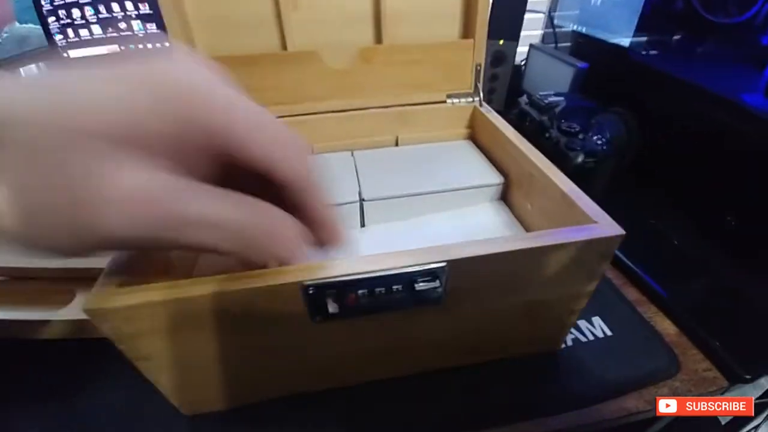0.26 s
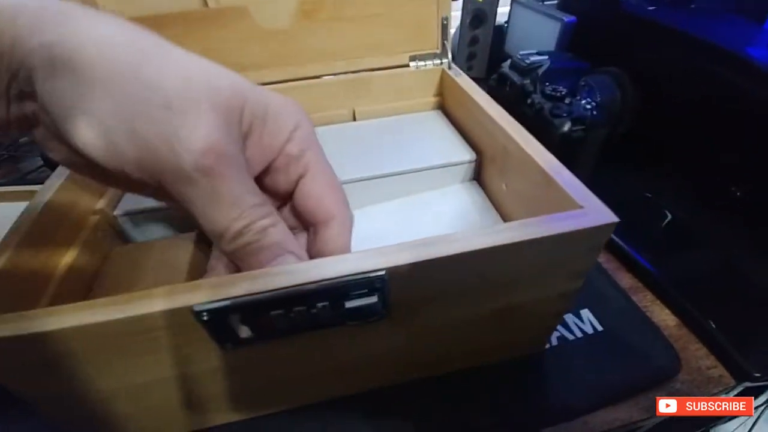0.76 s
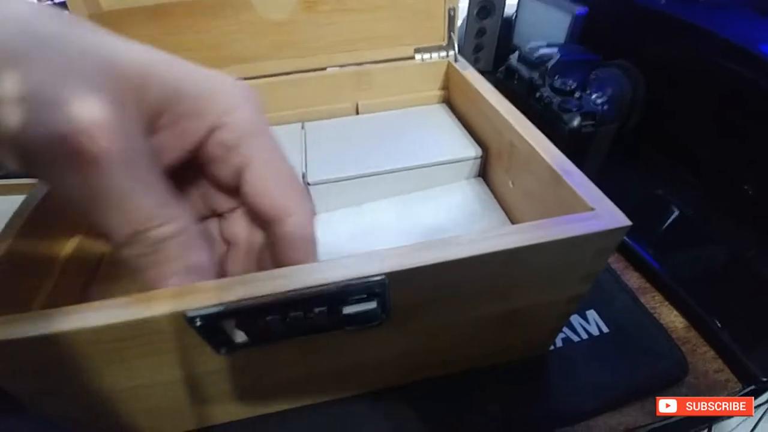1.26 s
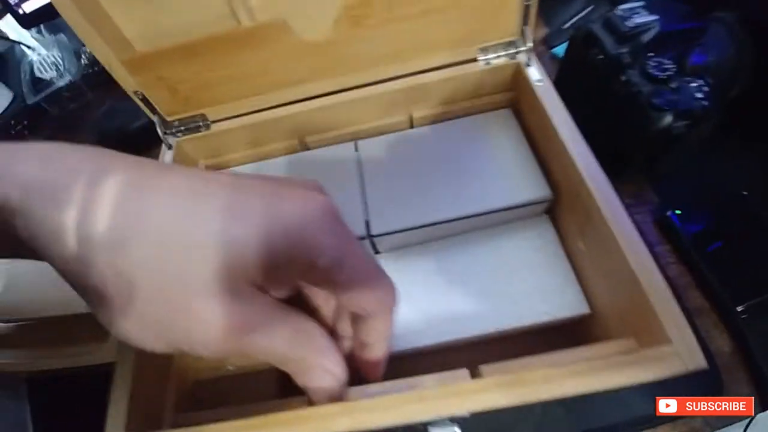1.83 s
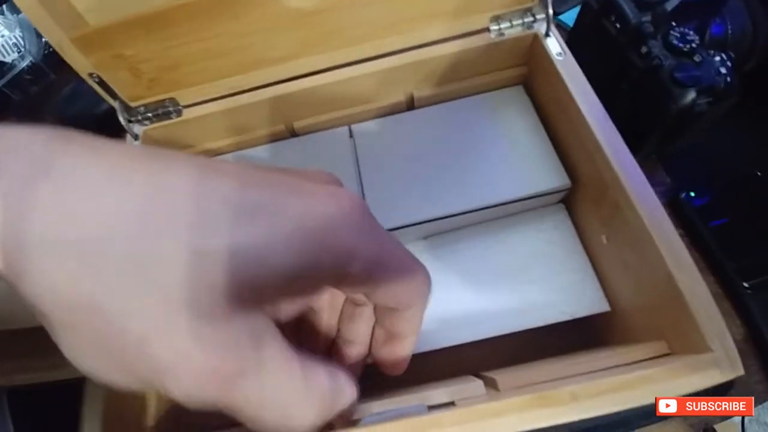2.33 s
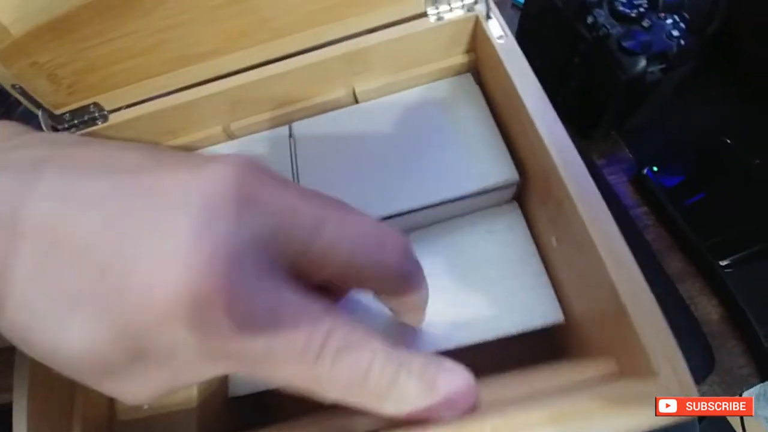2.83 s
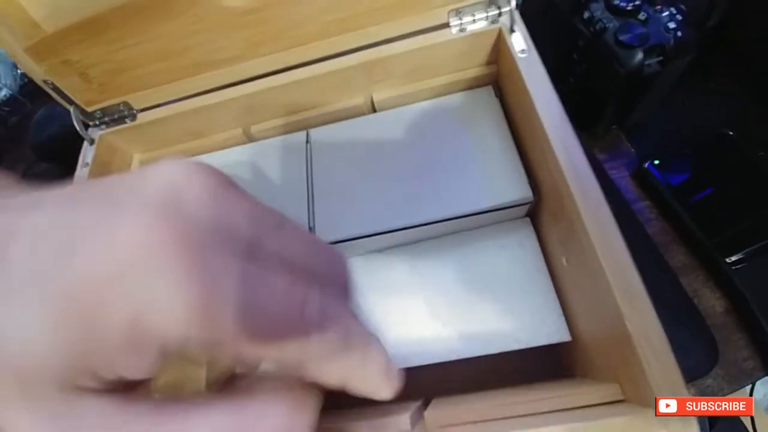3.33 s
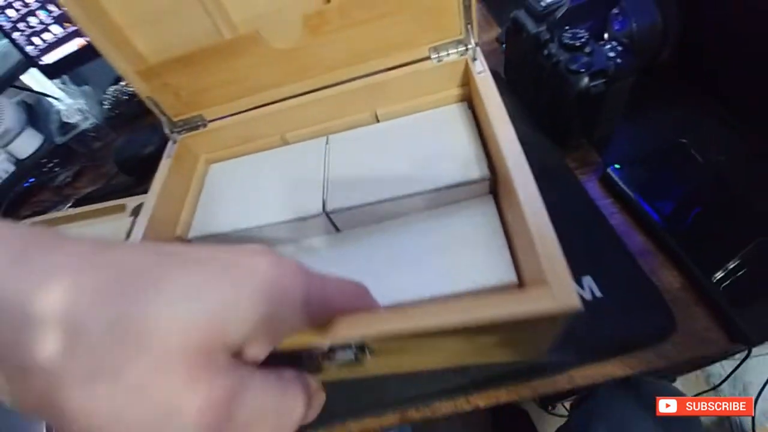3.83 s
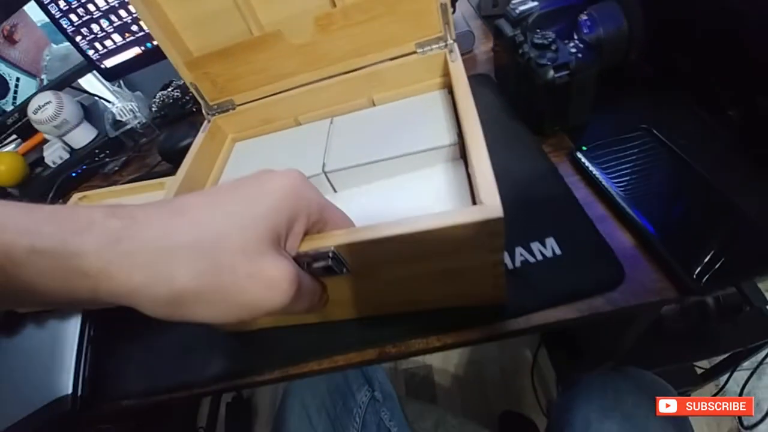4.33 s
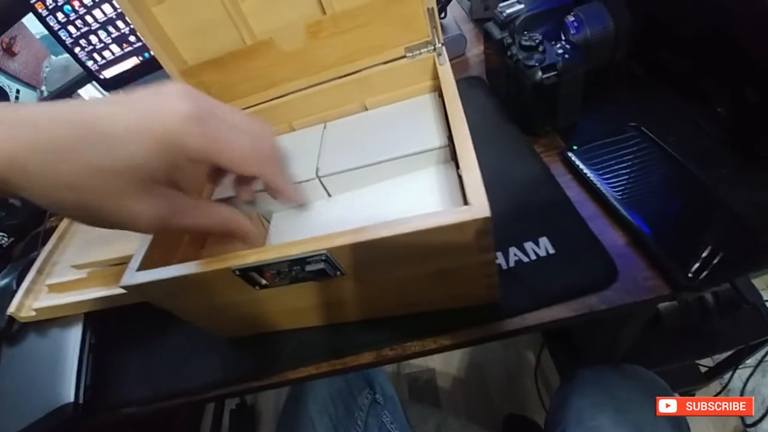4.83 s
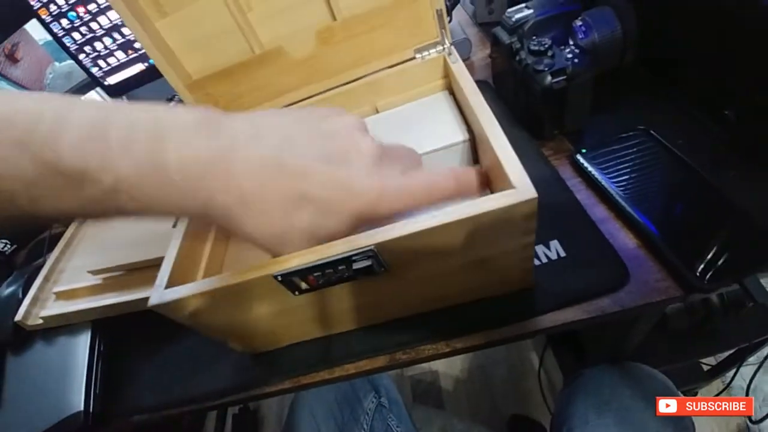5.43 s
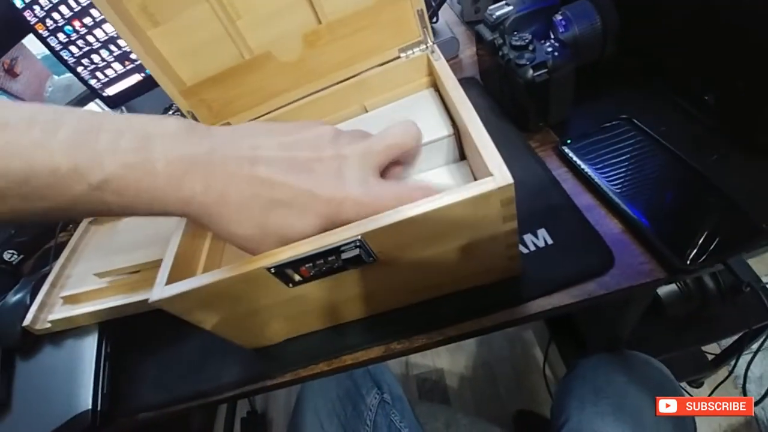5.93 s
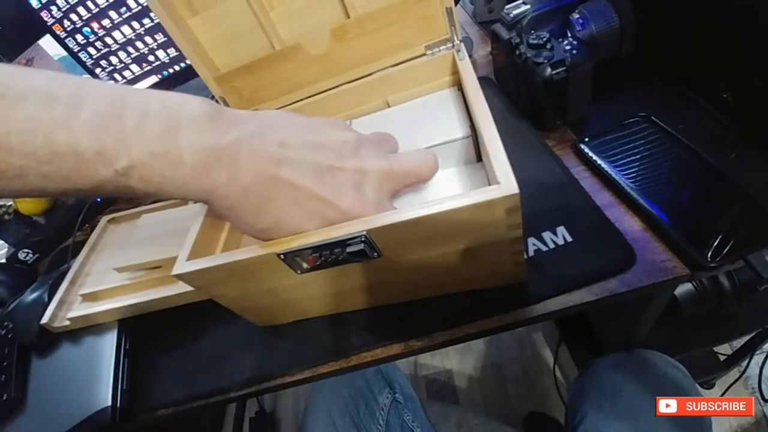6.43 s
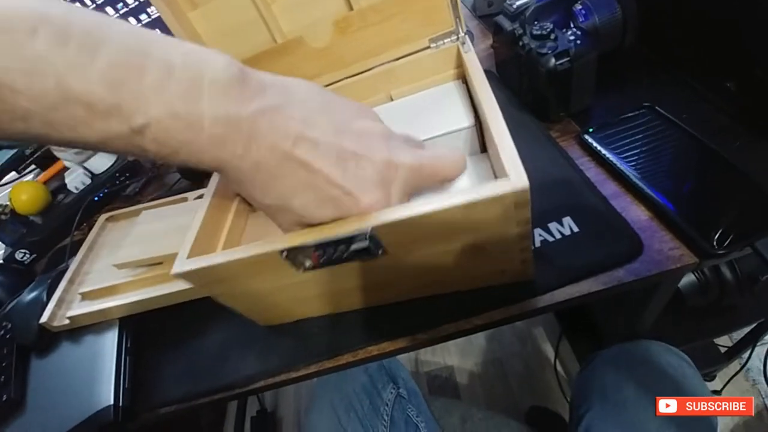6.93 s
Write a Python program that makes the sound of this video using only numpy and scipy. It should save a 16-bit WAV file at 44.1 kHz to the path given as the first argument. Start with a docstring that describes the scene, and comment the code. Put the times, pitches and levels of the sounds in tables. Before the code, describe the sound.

Foam blocks rub and hiss against the inside of a wooden box in short strokes, with small ticks, knocks and a late stuttering judder.

```python
"""Mains hum and fan noise run throughout; after a faint brush at 0.0 s, a hand works tight foam blocks and
dividers in a wooden box from about 0.25 s. Strokes are streams of tiny slips: foam hisses and sizzles,
edges scratch, walls rasp, the hollow hums. Bands of friction swell; edges tick, dividers knock, the box bumps.
From 6.28 to 6.63 s a block judders in stick-slip: each jerk is a noise snap, a wall ring and a thud.
A last hard catch, knock and bump come near 6.9 s, then strokes to 7.2 s."""
import sys
import numpy as np
from scipy import signal
from scipy.fft import rfft, irfft, next_fast_len
from scipy.io import wavfile
from scipy.ndimage import uniform_filter1d

SR = 44100
rng = np.random.default_rng(int(sys.argv[2]) if len(sys.argv) > 2 else 0)


def log_audio(samples):
    """Write samples as a 16-bit WAV file to the path given in sys.argv[1]."""
    # one column per channel
    frames = np.atleast_2d(samples).T
    # limit to full scale, then quantise
    limited = np.clip(frames, -1, 1)
    pcm = np.round(limited * 32767).astype(np.int16)
    wavfile.write(sys.argv[1], SR, pcm)


N = 316197
TIME = np.arange(N) / SR

# friction spectra, relative density: hz, level_db
HISS = [(2500, -19.5), (4000, -11), (5050, 2), (5700, -2), (6600, -2.5), (7100, -2), (7950, 4),
        (8600, -2.5), (9400, -12.5), (10300, -47), (12000, -47)]
SIZZLE = [(9300, -7.5), (11000, -13), (13100, -2), (14300, -3.5), (15700, -9)]
SCRATCH = [(1300, -3), (2200, 5.5), (2700, 1), (3200, 5.5), (4100, 5), (5000, -5.5), (7000, -35)]
RASP = [(400, -26.5), (700, -8.5), (835, -3.5), (945, -3.5), (1110, 2.5), (1370, -1), (1560, -4),
        (1800, -3), (2200, -15.5), (3000, -18.5)]
HOLLOW = [(130, -8.5), (190, -24.5), (260, -9), (350, -9), (430, 2.5), (520, -0.5), (630, -7.5), (850, -23)]
# fast roughness of the grip: spread, random level points per second
GRAIN_DB, GRAIN_PER_S = 1.0, 600


def rubbing(hand_db):
    """Foam drags over wood; the grip flutters and shakes all parts of the sound together."""
    hiss_db, rasp_db, hollow_db, sizzle_db = stroke_levels()
    grip_db = 1.76 * drift(25) + 1.0 * drift(90) + GRAIN_DB * drift(GRAIN_PER_S)

    foam_slips = between_walls(slips(per_s=2900, spread_db=3.0, smooth=0.9))
    hiss = from_db(hiss_db) * colour(foam_slips, closed(HISS))
    sizzle = from_db(sizzle_db - 8.5) * colour(foam_slips, closed(SIZZLE))

    # edge scratch lies between foam and wall, follows both
    scratch_db = 0.61 * hiss_db + 0.5 * rasp_db + 0.35
    edge_slips = between_walls(slips(per_s=1200, spread_db=1.0, smooth=0.72))
    scratch = from_db(scratch_db) * colour(edge_slips, closed(SCRATCH))

    wall_slips = slips(per_s=1500, spread_db=1.5, smooth=0.52)
    rasp = from_db(rasp_db) * retuned(colour(wall_slips, closed(RASP)))

    hollow_slips = slips(per_s=1000, spread_db=1.0, smooth=0.86)
    hollow = from_db(hollow_db) * colour(hollow_slips, closed(HOLLOW))

    return from_db(grip_db) * (pan(hiss + sizzle, hand_db) + scratch + rasp + pan(hollow, 4.5))


# strokes of foam over wood, levels relative:
# start_s, end_s, attack_s, swell_start_to_end_db, hiss_db, rasp_db, hollow_db, sizzle_db
STROKES = [(0.0, 0.049, 0.052, -12, -44, -45, -53, -88), (0.248, 0.285, 0.00053, 2, -40, -35, -30.5, -51),
           (0.263, 0.327, 0.0022, 5, -22.5, -31.5, -44, -22),
           (0.342, 0.43, 0.002, -16, -47, -48.5, -47, -58.0),
           (0.469, 0.592, 0.014, -2, -39, -42.5, -46, -45), (0.684, 0.769, 0.01, 12, -28, -36.5, -42, -37),
           (0.839, 0.947, 0.011, -2, -26.5, -27.5, -35, -35),
           (0.972, 1.154, 0.0066, -2.5, -28, -34, -45, -38),
           (1.135, 1.274, 0.0082, 35, -49, -48.5, -52.5, -54),
           (1.311, 1.389, 0.038, 4, -28.5, -31.5, -38, -37),
           (1.484, 1.84, 0.0028, -15.5, -52.5, -51, -54.5, -80),
           (1.64, 1.681, 0.012, -12.5, -38.5, -38, -39, -50),
           (1.834, 1.964, 0.0022, 20.5, -35, -34.5, -46.5, -40),
           (1.963, 2, 0.002, 20, -38, -36.5, -43.5, -46), (2.096, 2.224, 0.014, 1, -57.5, -51.5, -48, -69),
           (2.21, 2.226, 0.0016, 15.5, -30, -35, -48, -29.5),
           (2.275, 2.386, 0.00093, 25, -30, -40.5, -54, -34),
           (2.416, 2.486, 0.029, 3.5, -16, -31.5, -35.5, -12.5),
           (2.648, 2.646, 0.024, 15, -21.5, -33, -37, -28),
           (2.719, 2.803, 0.0061, -9.5, -22.5, -36, -41.5, -26),
           (2.786, 3.045, 0.0019, -7.5, -41.5, -45.5, -47.5, -48.5),
           (3.212, 3.23, 0.01, 7, -23.5, -31.5, -36.5, -25),
           (3.449, 3.465, 0.0085, -26, -24.5, -65, -50, -35),
           (3.469, 3.564, 0.015, 11, -39, -34, -39.5, -40),
           (3.574, 3.686, 0.026, -4, -18, -32.5, -33, -21.5),
           (3.684, 3.867, 0.004, 19, -33.5, -36.5, -38, -40),
           (3.887, 3.995, 0.0039, 3, -39.5, -36.5, -40.5, -44),
           (3.98, 4.23, 0.0026, -7, -50, -55, -56.5, -54), (4.25, 4.507, 0.0076, 7.5, -32, -35, -42.5, -40),
           (4.482, 4.529, 0.028, 0, -14.5, -40, -38, -21), (4.817, 4.913, 0.073, 18, -58, -56, -54.5, -65),
           (4.926, 5.067, 0.0015, 12, -26, -40, -65, -26.5),
           (5.001, 5.178, 0.013, -8.5, -29, -33.5, -35, -36),
           (5.244, 5.311, 0.0066, -6, -20.5, -29, -30.5, -22.5),
           (5.431, 5.488, 0.035, -19, -20.5, -29.5, -35.5, -25.5),
           (5.621, 5.706, 0.019, -4, -29, -36.5, -44.5, -32),
           (5.75, 5.819, 0.027, -12.5, -28.5, -33, -52.5, -34),
           (5.929, 5.993, 0.047, -18, -23.5, -38.5, -42.5, -24),
           (5.95, 6.115, 0.0032, -8, -36.5, -37.5, -61, -44),
           (6.127, 6.243, 0.034, -16, -20, -31, -30, -25), (6.215, 6.654, 0.01, -4.5, -28.5, -27, -36, -33),
           (6.693, 6.913, 0.059, -5.5, -36, -40, -48.5, -38.5),
           (6.892, 7.064, 0.0031, -7, -31.5, -29, -42, -41),
           (7.064, 7.196, 0.017, -0.5, -25.5, -28, -37.5, -32)]
# slope against stroke speed: hiss, rasp, hollow, sizzle [dB per dB]
FOLLOWS_SPEED = [1.19, 0.92, 0.69, 1.33]
# fingers brushing the foam from TOUCH_S on: hiss_db, rasp_db, hollow_db, sizzle_db
BRUSH_DB = [-70.5, -83, -82, -106]
# level change of the steady rubbing during the whole judder: hiss_db, rasp_db, hollow_db, sizzle_db
STUCK_DB = [-1, -2.5, -7, 0]
TOUCH_S, RELEASE_S = 0.25, 0.011


def stroke_levels():
    """Each push sets in, swells or fades, and glides to rest; gives hiss, rasp, hollow and sizzle in dB."""
    t = np.arange(0, N / SR + .001, .001)
    power = 1e-12 + from_db(BRUSH_DB)[:, None] ** 2 * (t > TOUCH_S)
    for start_s, end_s, attack_s, swell_db, *levels_db in STROKES:
        onset = np.logaddexp(0, (start_s - t) / attack_s)
        release = np.logaddexp(0, (t - end_s) / RELEASE_S)
        swell = swell_db * np.interp(t, [start_s, end_s], [-.5, .5])
        speed_db = swell - 20 / np.log(10) * (onset + release)
        stroke_db = np.array(levels_db)[:, None] + np.outer(FOLLOWS_SPEED, speed_db)
        power = power + from_db(stroke_db) ** 2
    juddering = (t > JERKS[0][0]) & (t < JERKS[-1][0])
    stuck = uniform_filter1d(1. * juddering, size=40)  # 40 ms edges
    return [np.interp(TIME, t, 10 * np.log10(p) + drop_db * stuck) for p, drop_db in zip(power, STUCK_DB)]


def slips(per_s, spread_db, smooth):
    """Two streams of micro-slips of uneven size on a bed of smooth friction noise."""
    sizes = from_db(spread_db * np.minimum(rng.exponential(1, (2, N)), 4))
    signed = sizes * rng.choice([-1, 1], (2, N))
    happens = rng.random((2, N)) < per_s / SR
    return rms_one(signed * happens) + smooth * rng.standard_normal((2, N))


def between_walls(streams, count=4):
    """Echoes off the near walls, their paths changing as the hand moves, comb friction into shifting bands."""
    out, at = streams.copy(), np.arange(N)
    for k, lag_s in enumerate(np.geomspace(.0005, .0026, count)):
        for side in range(2):
            lag = lag_s * SR * np.exp(.4 * drift(3))
            out[side] += (-1) ** k * .42 * np.interp(at - lag, at, streams[side])
    return out


WALL_DETUNE = 0.012  # spread of log speed


def retuned(x):
    """Hand and blocks load the thin walls differently as they move, so their resonances slide a little."""
    speed = np.exp(WALL_DETUNE * drift(3))
    at = np.cumsum(speed / speed.mean())
    return np.array([np.interp(at, np.arange(N), channel) for channel in x])


# bands swelling in a stroke or brief touch, levels relative: start_s, end_s, centre_hz, width_hz, level_db
SINGS = [(0.241, 0.265, 2760, 895, -23.5), (0.252, 0.334, 5130, 330, -13.5), (0.804, 0.983, 1146, 376, -23),
         (0.97, 1.113, 1700, 450, -28.5), (1.166, 1.195, 1820, 1650, -20.5), (1.901, 2.032, 1660, 260, -21),
         (2.269, 2.33, 1460, 640, -26.5), (2.317, 2.424, 6130, 250, -26), (2.406, 2.5, 8070, 300, -14.5),
         (2.708, 2.758, 5100, 1200, -18.5), (3.539, 3.715, 1110, 750, -14.5),
         (3.792, 3.885, 1110, 785, -18.5), (4.48, 4.534, 7900, 350, -15), (4.473, 4.517, 3070, 446, -21.5),
         (4.686, 4.698, 3440, 890, -32.5), (4.713, 4.722, 8100, 2080, -19.5),
         (4.736, 4.95, 3200, 1200, -51), (4.927, 4.96, 7750, 1410, -15), (5.194, 5.252, 910, 160, -27),
         (5.406, 5.45, 917, 157, -15), (6.066, 6.224, 1055, 250, -15.5), (6.173, 6.475, 3440, 2400, -30),
         (6.557, 6.559, 6740, 2600, -2.5)]


def singing(hand_db):
    """Friction swells in one band, narrow or broad, during part of a stroke or a brief touch."""
    out, streams = np.zeros((2, N)), slips(per_s=740, spread_db=3.5, smooth=0.34)
    for start_s, end_s, hz, width_hz, db in SINGS:
        span = slice(int(start_s * SR), int(end_s * SR))
        friction = streams[:, span] + 0.24 * streams[::-1, span]  # partly shared by both channels
        edges_hz = [max(hz - width_hz / 2, hz / 2), hz + width_hz / 2]
        band = signal.butter(2, edges_hz, "band", fs=SR, output="sos")
        tone = rms_one(signal.sosfilt(band, friction))
        out[:, span] += from_db(db - 6.5) * tone * signal.windows.tukey(friction.shape[1], .7)
    return pan(out, hand_db)


# jerks of a tight block along the wall, levels relative: start_s, snap_db, wall_db, thud_db
JERKS = [(6.277, -28, -31, -14), (6.3, -25, -14, -8.5), (6.324, -17, -10, -9), (6.3456, -18, -11.5, -9),
         (6.378, -18, -9, -8), (6.3968, -25, -9, -13.5), (6.426, -22, -7, -10), (6.4447, -7, -15, -32),
         (6.452, -15, -9, -6.5), (6.473, -17, -12, -20), (6.49, -19, -11, -8.5), (6.518, -11, -3, -5),
         (6.5489, -12.5, -10, -33), (6.575, -11, -11, -11), (6.603, -5, -3, -34), (6.633, -15.5, -12, -42)]
# block snap spectrum, relative density: hz, level_db
BLOCK_SNAP = [(800, -25), (2000, 10), (5000, 7), (8000, 13.5), (10500, -8), (16000, -6)]
# cushioned thud modes, nominal: pitch_hz, level_db, t60_s
THUD_MODES = [(324, -10, 0.051), (500, 15, 0.013), (873, -4.5, 0.041)]
JERK_SNAP_S = 0.003


def judder():
    """The whole block jumps and stops, so each jerk snaps and also gives a cushioned thud."""
    snap_rows = [(s, snap_db, wall_db, JERK_SNAP_S) for s, snap_db, wall_db, _ in JERKS]
    thud_rows = [(s, thud_db, 1) for s, _, _, thud_db in JERKS]
    return catches(snap_rows, BLOCK_SNAP) + strike(thud_rows, THUD_MODES, rise_s=0.0057)


# edge catches, levels relative: start_s, snap_db, wall_db, snap_decay_s
TICKS = [(0.246, -51, -25, 0.0014), (0.283, -5, -20, 0.0023), (0.841, -33, -13.5, 0.0032),
         (1.585, -25.5, -24.5, 0.0034), (1.865, -19.5, -17.5, 0.002), (1.944, -13.5, -25, 0.0042),
         (2.654, -18.5, -56, 0.0035), (3.44, -16, -24, 0.0085), (3.992, -37, -18.5, 0.0033),
         (4.289, -25, -28, 0.0052), (4.307, -16.5, -22, 0.0014), (4.327, -15, -22, 0.0017),
         (4.685, -30, -70, 0.00092), (4.6935, -28.5, -74, 0.0013), (4.724, -26.5, -52, 0.0014),
         (4.749, -33, -46, 0.0014), (5.656, -20, -43, 0.0036), (5.832, -16, -32, 0.0018),
         (5.8477, -1, -13.5, 0.0023), (6.808, -19, -49, 0.003), (6.899, -13.5, -6.5, 0.0029),
         (7.05, -16.5, -50, 0.0081)]
# edge snap spectrum, relative density: hz, level_db
EDGE_SNAP = [(1300, -26), (2700, 5), (5000, 10), (8200, 11), (10500, -12), (13000, -3.5), (16000, -16)]


def ticks():
    """Catches of an edge on the wood of the box."""
    return catches(TICKS, EDGE_SNAP)


# thin wall modes, nominal: pitch_hz, level_db, t60_s
WALL_MODES = [(1018, -1.5, 0.0072), (1143, 1, 0.015), (1330, -7.5, 0.016), (1874, -9, 0.017)]


def catches(rows, spectrum):
    """A catch tears free within a millisecond: a gritty noise snap and a ring of the wall."""
    burst, t = np.zeros((2, N)), TIME[None, :SR // 20]
    for s, snap_db, _, decay_s in rows:
        add(burst, s, from_db(snap_db) * np.exp(-t / decay_s))
    grit = colour(between_walls(rng.standard_normal((2, N))), closed(spectrum))
    wall = strike([(s, wall_db, 1) for s, _, wall_db, _ in rows], WALL_MODES, rise_s=0.00091)
    return pan(uniform_filter1d(burst, size=30) * grit, 2.2) + wall


# dividers knocking on the box, levels relative: start_s, level_db, pitch_ratio
KNOCKS = [(0.343, -15, 1.05), (1.1805, -8.5, 1.06), (1.205, -22.5, 0.81), (1.237, -26, 0.94),
          (1.371, -18, 0.95), (1.599, -27, 0.89), (1.63, -29, 0.99), (1.665, -27, 1.07), (1.757, -28, 0.87),
          (1.778, -20.5, 0.91), (1.79, -20, 1.07), (1.798, -23, 0.94), (2.334, -29, 0.98),
          (2.369, -15.5, 1.025), (2.722, -24, 0.94), (2.836, -32, 0.79), (3.059, -39, 1.3),
          (4.724, -37.5, 0.97), (4.969, -24, 1.02), (5.023, -24, 1.02), (5.074, -28, 1.02),
          (5.73, -26, 1.07), (6.898, -13, 0.9)]
# hollow box modes, nominal: pitch_hz, level_db, t60_s
HOLLOW_MODES = [(325, -3.5, 0.02), (447.4, 1.5, 0.038), (421, -6, 0.13), (526, -14.5, 0.03),
                (1250, -18.5, 0.027)]
# box bumping on the desk, levels relative: start_s, level_db
BUMPS = [(0.275, -22.5), (1.552, -25), (1.612, -26), (2.242, -32), (2.379, -26), (2.974, -28.5),
         (3.211, -30), (5.463, -17.5), (6.898, -19)]
# desk modes, nominal: pitch_hz, level_db, t60_s
DESK_MODES = [(72, 0.5, 0.055), (137.7, -7, 0.072)]


def knocks():
    """Padded blows on the hollow box, and the box on the desk, each ringing a set of modes."""
    box = strike(KNOCKS, HOLLOW_MODES, rise_s=0.002)
    desk = strike([(s, db, 1) for s, db in BUMPS], DESK_MODES, rise_s=0.0052)
    return box + desk


# left lean of struck modes: hz, left_over_right_db
BALANCE = [(60, 3), (350, 4.4), (600, 6.2), (1200, 0.24), (2500, 6.9), (5000, 2.5)]
# mode spread from blow to blow: level, share of pitch
BLOW_UNEVEN_DB, BLOW_DETUNE = 1.5, 0.025


def strike(blows, modes, rise_s):
    """Each blow builds up over its contact and rings every mode with a strength and pitch of its own."""
    out, t = np.zeros((2, N)), TIME[:SR // 4]
    contact = 1 - np.exp(-t / rise_s)
    for s, db, pitch_ratio in blows:
        spreads = rng.standard_normal((len(modes), 2))
        for (hz, mode_db, t60_s), (louder, higher) in zip(modes, spreads):
            rung_hz = hz * pitch_ratio * (1 + BLOW_DETUNE * higher)
            swing = np.sin(2 * np.pi * rung_hz * t) * contact
            level_db = db + mode_db + BLOW_UNEVEN_DB * louder - 60 * t / t60_s
            add(out, s, pan(swing * from_db(level_db), at_hz(BALANCE, hz)))
    return out


ROOM_T60_S = 0.13  # before the treble cut


def room(x, wall_cut_hz):
    """Dense, slightly dull reflections of a small furnished room: low-passed, decaying noise."""
    t = TIME[:SR // 2]
    tail = rng.standard_normal((2, len(t))) * from_db(-60 * t / ROOM_T60_S) * (t > .004)
    tail = signal.sosfilt(signal.butter(1, wall_cut_hz, fs=SR, output="sos"), tail)
    return signal.fftconvolve(x, tail / np.sqrt(np.sum(tail ** 2) / 2), axes=1)[:, :N]


# background swing as the microphone moves about: time_s, swing_db
BACKGROUND_LEVEL = [(0.1, -6.5), (0.9, 3), (2.2, -5), (3.35, -11), (3.9, 0), (4.7, -3.5), (5.2, 4),
                    (7.17, 6.5)]
# mains hum, level before swing and waver: mains_multiple, rms_db, share_of_swing
HUM = [(1, -51, 0.43), (2, -53, 0.72)]
# fan spectrum, relative density: hz, level_db
FAN = [(25, -18), (65, -7), (150, -15.5), (190, -15.5), (450, -23.5), (1300, -35), (1800, -28), (3300, -42),
       (8000, -47.5), (11000, -68)]
MAINS_HZ, HUM_WAVER_DB = 60, 1.8
FAN_DB, FAN_FOLLOWS = -51.5, 0.45  # level before swing, share of swing


def background():
    """A computer fan as shaped noise and a mains hum as sines of wavering level."""
    swing_db, = in_time(BACKGROUND_LEVEL)
    hum = 0
    for multiple, db, share in HUM:
        level_db = db + share * swing_db + HUM_WAVER_DB * drift(3.9)
        phase = 2 * np.pi * (multiple * MAINS_HZ * TIME + rng.random())
        hum = hum + from_db(level_db) * np.sqrt(2) * np.sin(phase)
    fan = from_db(FAN_DB + FAN_FOLLOWS * swing_db) * colour(rng.standard_normal((2, N)), FAN)
    return pan(hum + fan, 3.4)


# stereo likeness: hz, left_right_correlation
LIKENESS = [(100, 1), (450, 0.8), (1100, 0.5), (2000, 0), (5000, -0.11), (8000, 0.56), (13000, 0.75)]


def colour(streams, spectrum):
    """Shape a pair: alike in the bass, unlike from 2 to 5 kHz, more alike again in the treble; rms 1."""
    size = next_fast_len(N)
    hz = np.maximum(np.fft.rfftfreq(size, 1 / SR), 1)
    mid, side = rfft(streams, size) * from_db(at_hz(spectrum, hz))
    alike = np.clip(at_hz(LIKENESS, hz), -1, 1)
    pair = np.sqrt(1 + alike) * mid + np.sqrt(1 - alike) * side * [[1], [-1]]
    return rms_one(irfft(pair, size)[:, :N])


def closed(spectrum):
    """Let a spectrum fall to -70 dB an octave beyond each end."""
    return [(spectrum[0][0] / 2, -70), *spectrum, (spectrum[-1][0] * 2, -70)]


def drift(per_s):
    """Random wander with rms 1, linear between per_s random points a second."""
    knots = rng.standard_normal(int(N / SR * 2000))
    return rms_one(np.interp(TIME * per_s, np.arange(len(knots)), knots))


def pan(x, db):
    """Lean to the left by db at equal power."""
    gains = from_db(np.array([[.5], [-.5]]) * db)
    return x * gains / np.sqrt(np.mean(gains ** 2, axis=0))


def add(out, s, sound):
    """Mix a sound into both channels at a time."""
    at = int(np.clip(s * SR, 0, N - 1))
    out[:, at:at + sound.shape[1]] += sound[:, :N - at]


def at_hz(points, hz):
    """Read a spectrum on a log-frequency axis."""
    points_hz, values = np.array(points).T
    return np.interp(np.log(hz), np.log(points_hz), values)


def in_time(rows):
    """Each column of a curve at every sample."""
    s, *columns = np.transpose(rows)
    return [np.interp(TIME, s, c) for c in columns]


def rms_one(x):
    """Scale to unit rms."""
    return x / np.sqrt(np.mean(x ** 2) + 1e-20)


def from_db(db):
    """Decibels to gain."""
    return 10 ** (np.asarray(db) / 20)


# where the hand works: time_s, left_over_right_db
PLACE = [(0.25, 3.5), (1.25, 4), (1.8, 1), (2.45, 0), (2.7, 2.5), (3.3, 3.5), (3.7, 0.5), (4.5, 3),
         (7.17, 3)]


def scene():
    """Strokes and contacts close by, with a little room, over the background."""
    hand_db, = in_time(PLACE)
    strokes = rubbing(hand_db) + singing(hand_db)
    hits = ticks() + judder() + knocks()
    reflections = room(from_db(-13.5) * hits + from_db(-16.5) * strokes, wall_cut_hz=5500)
    return strokes + hits + reflections + background()


MIC_LOW_CUT_HZ, CUTOFF_HZ = 47, 16100


def record(dry):
    """The deepest bass is lost, the highest peaks are rounded and the top is cut."""
    thinned = signal.sosfilt(signal.butter(2, MIC_LOW_CUT_HZ, "high", fs=SR, output="sos"), dry)
    rounded = np.tanh(thinned)
    return signal.sosfilt(signal.ellip(12, .1, 80, CUTOFF_HZ, fs=SR, output="sos"), rounded)


dry = scene()
out = record(dry)
log_audio(out)
```